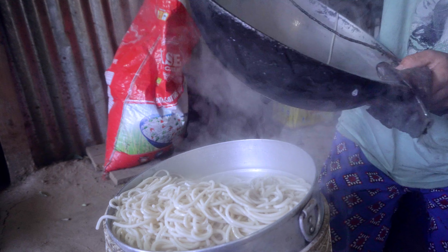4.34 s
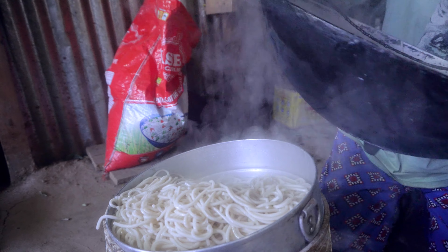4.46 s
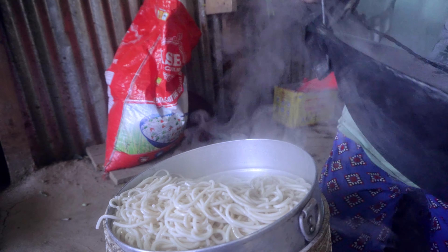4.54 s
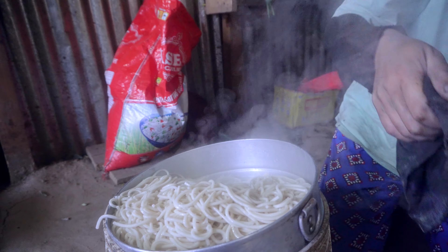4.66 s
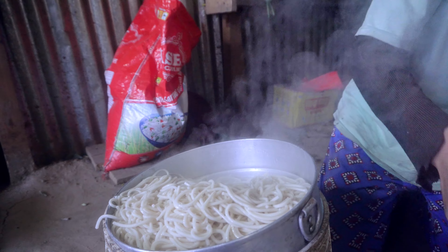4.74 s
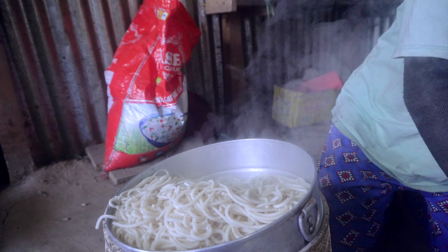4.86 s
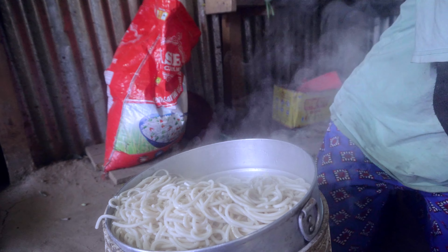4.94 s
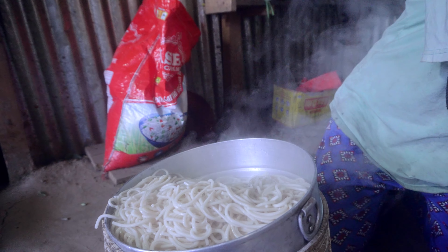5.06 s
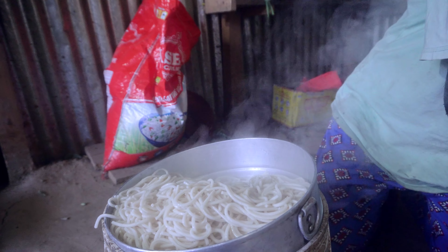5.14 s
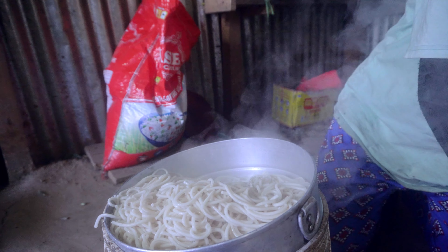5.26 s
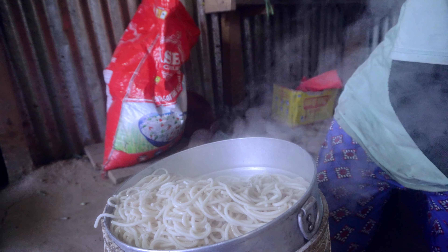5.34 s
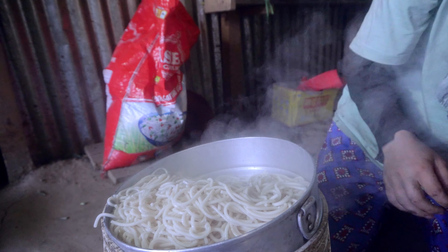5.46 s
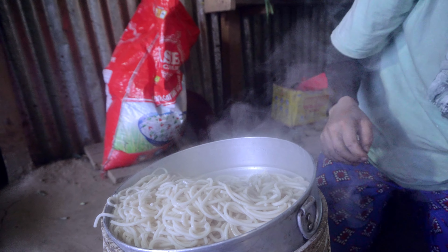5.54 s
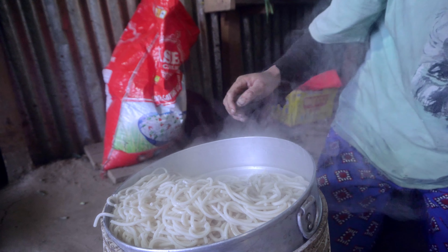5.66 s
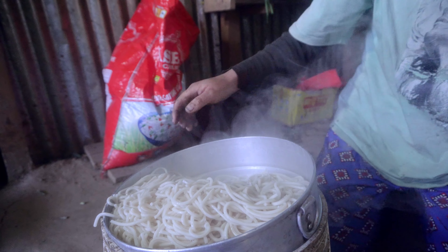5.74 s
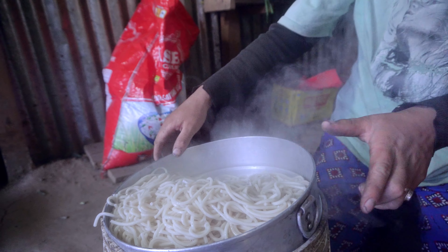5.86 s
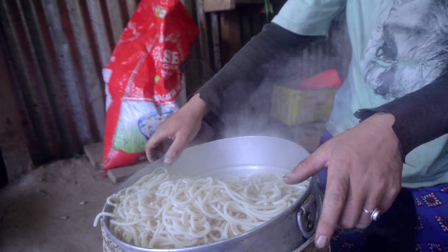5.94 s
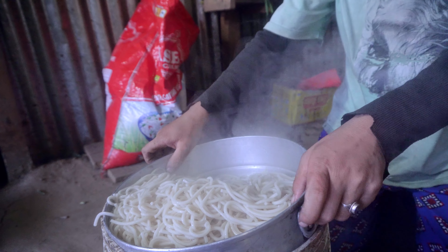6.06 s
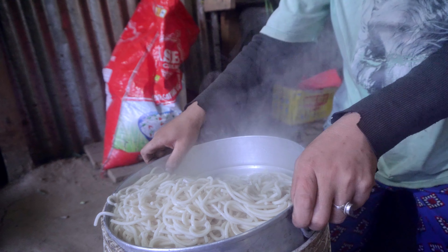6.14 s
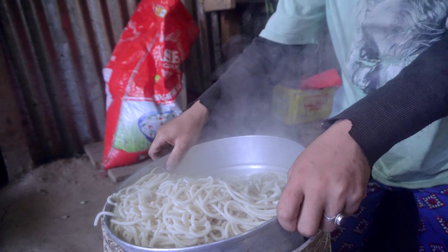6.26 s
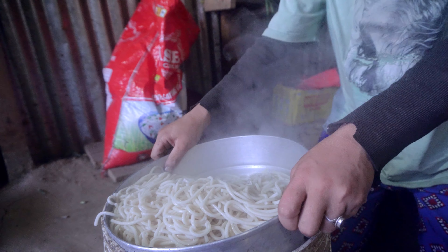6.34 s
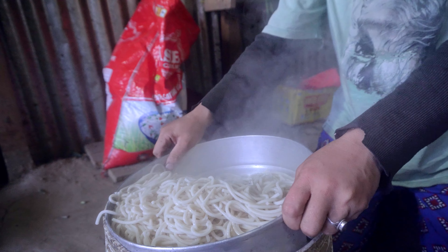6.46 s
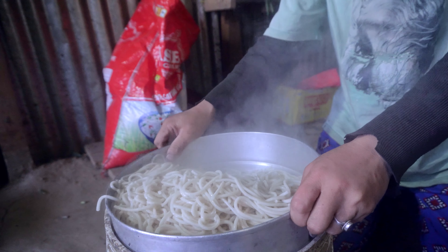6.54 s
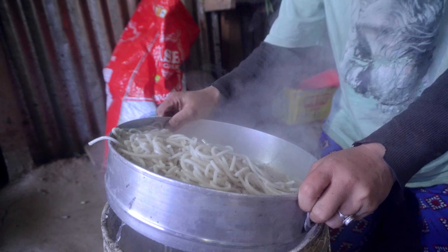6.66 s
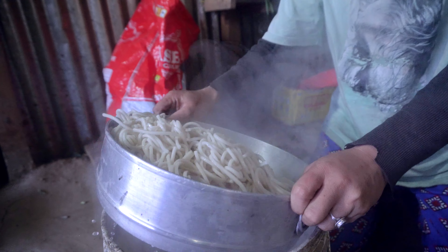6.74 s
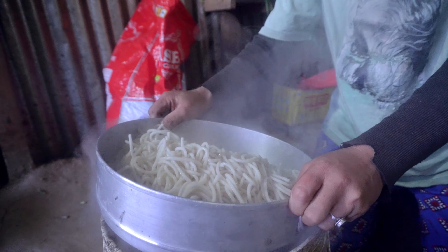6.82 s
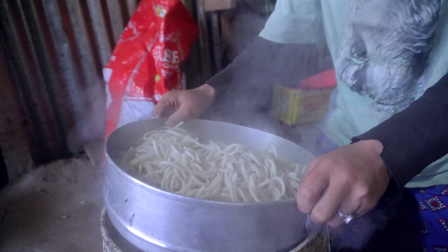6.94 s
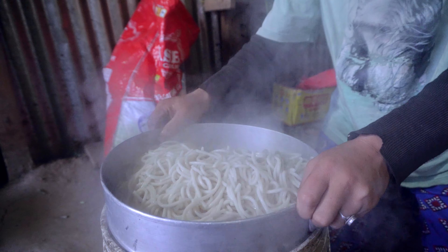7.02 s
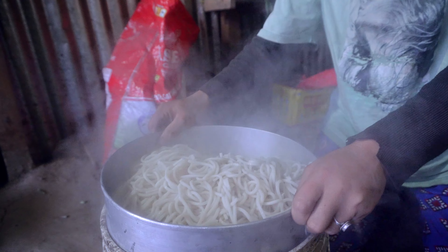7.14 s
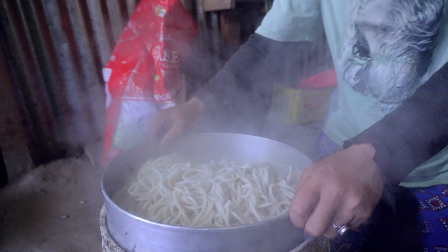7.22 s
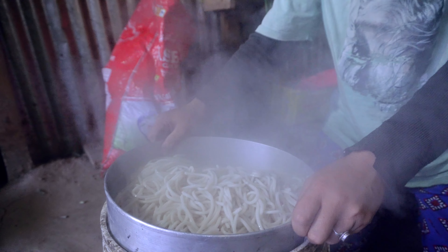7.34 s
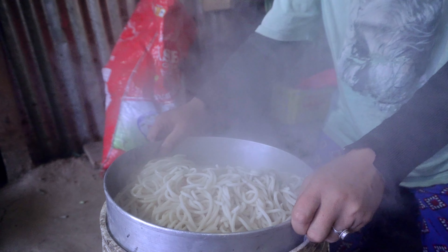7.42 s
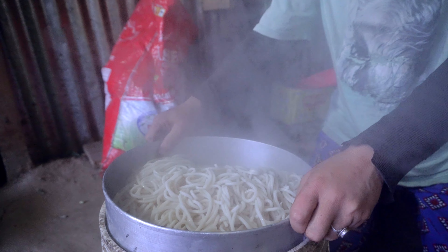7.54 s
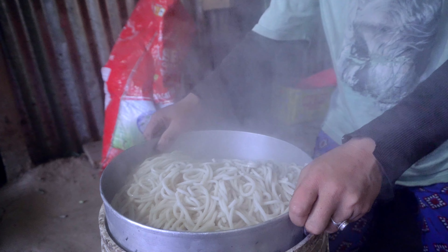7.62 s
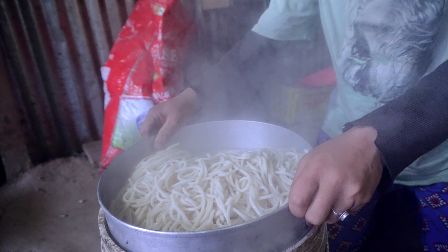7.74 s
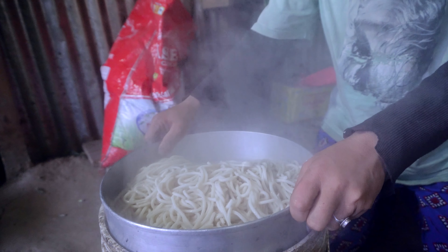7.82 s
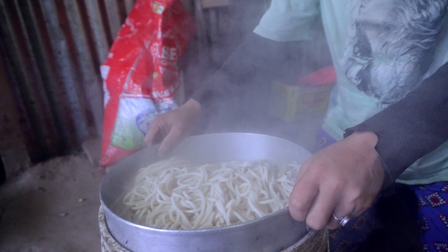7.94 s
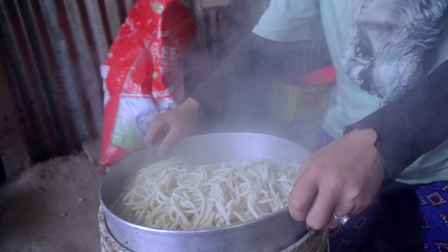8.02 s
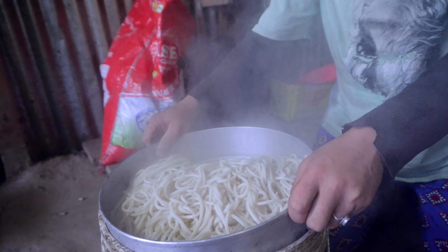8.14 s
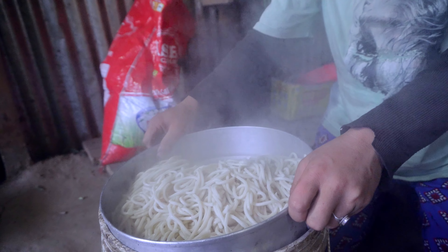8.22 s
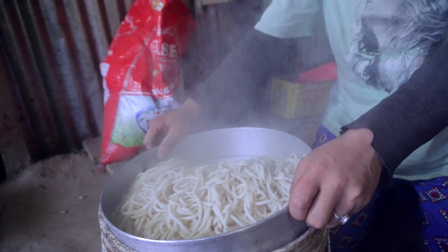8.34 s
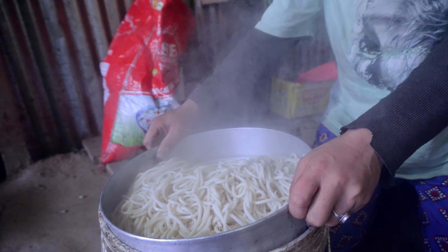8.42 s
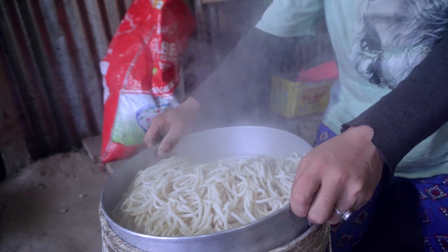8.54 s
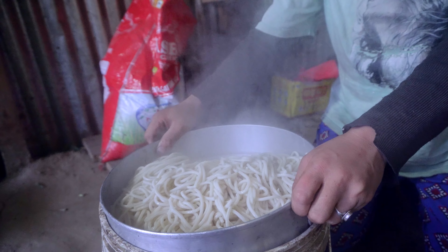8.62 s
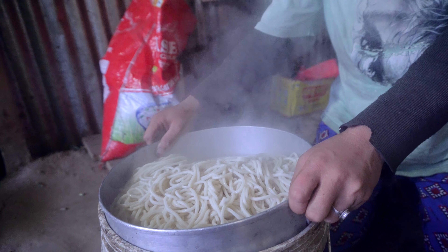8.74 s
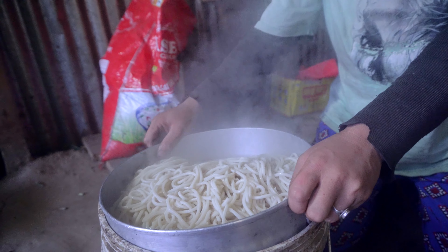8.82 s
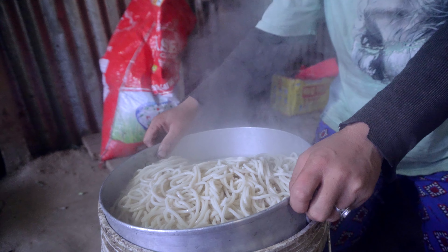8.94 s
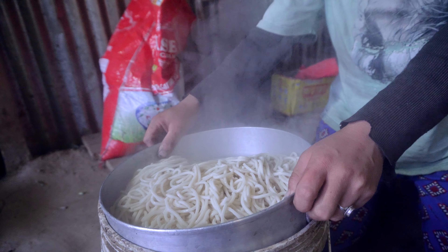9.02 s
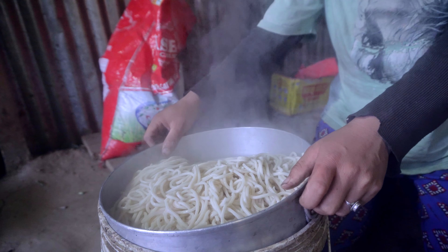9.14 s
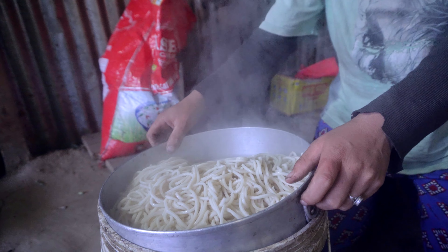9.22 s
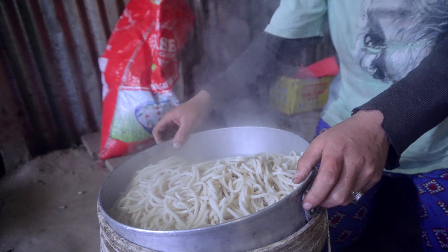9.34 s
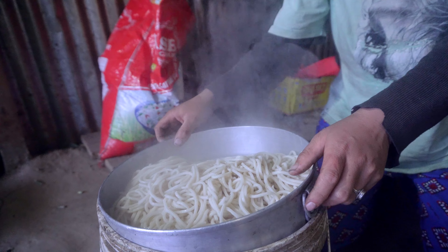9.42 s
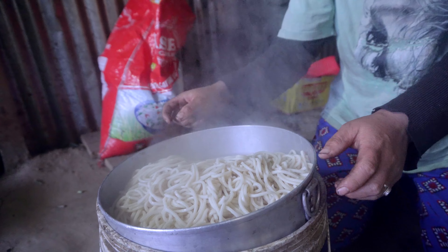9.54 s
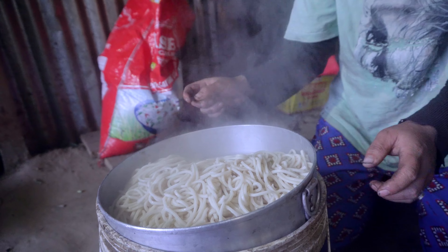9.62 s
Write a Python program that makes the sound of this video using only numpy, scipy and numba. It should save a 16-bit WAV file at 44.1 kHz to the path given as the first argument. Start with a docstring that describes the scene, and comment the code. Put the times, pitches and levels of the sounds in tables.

```python
"""Pouring out boiled noodles

Boiled noodles and their water are poured from a wok into a perforated metal tray in a small kitchen.
The stream gurgles and spatters, then thins to a trickle that drips into the vessel below.
The tray is lifted, shaken so that the wet noodles slither, and set down with a clank.
Water is made of many small ringing bubbles and puffs of noise; metal is gritty noise that rings the tray.
"""
import sys
import numpy as np
from scipy import signal
from scipy.fft import rfft, irfft, next_fast_len
from scipy.io import wavfile
from scipy.ndimage import uniform_filter1d
from numba import njit

SR = 44100
rng = np.random.default_rng(int(sys.argv[2]) if len(sys.argv) > 2 else 0)


def int16_out(signal):
    """Quantize to a 16-bit WAV file."""
    q = np.round(np.clip(np.atleast_2d(signal).T, -1, 1) * 32767)
    wavfile.write(sys.argv[1], SR, q.astype(np.int16))


N = 426888
TIME = np.arange(N) / SR

# Colours of the water sounds, the big bubbles first.
# Each row: frequency in Hz, strength in dB per Hz (only the shape matters).
GURGLE_COLOUR = [(60, -70), (140, -10), (200, -34.5), (290, -16), (390, -16.5), (560, 0.5), (680, 1.5),
                 (900, -8.5), (1600, -40)]
BUBBLING_COLOUR = [(150, -74), (640, -3), (840, 4), (1000, -0.5), (1500, 0.5), (1900, -11.5), (2600, -9.5),
                   (5000, -40)]
SPATTER_COLOUR = [(150, -36.5), (1300, -2), (2100, 2), (3400, 1), (4700, -1), (7000, -7), (11000, -13.5),
                  (15500, -11.5)]
TRICKLE_COLOUR = [(50, -51), (150, -1), (460, -6), (650, -8), (1150, -5.5), (1500, -3), (1900, -7.5),
                  (2800, -3.5), (7000, -27.5)]
SLITHER_COLOUR = [(200, -59), (900, 8.5), (1800, 0.5), (3000, 1.5), (4500, 1.5), (7000, -4.5),
                  (11000, -10.5), (15500, -7)]
# Colours of the slaps and ticks, the metal on its stand, the dull bumps, the low scuffs and the steady hiss.
# Each row: frequency in Hz, strength in dB per Hz (only the shape matters).
SLAP_COLOUR = [(500, -12), (2500, -4.5), (5500, 5.5), (9000, -8.5), (15500, -14)]
CONTACT_COLOUR = [(80, -46), (420, -10.5), (850, 1), (1400, 6.5), (2400, 1), (4300, 4), (8500, -10.5),
                  (15000, -16)]
BUMP_COLOUR = [(60, -25), (160, 8), (380, 2.5), (900, -15.5)]
SCUFF_COLOUR = [(50, -6), (110, -3), (180, 8), (380, 11), (700, -6), (2000, -43)]
HISS_COLOUR = [(40, -27), (1200, 9), (3500, 5), (12000, -11.5)]
HISS_DB = -55.5

# Strength of the stream leaving the wok. Each row: time in seconds, flow in dB.
FLOW = [(0, -36.5), (0.62, -38), (1.85, -36.5), (2.1, -39), (3.15, -38), (3.31, -42.5), (3.5, -37),
        (4.35, -39), (4.9, -41), (5.25, -39.5), (5.45, -51.5)]
STOP_DB_PER_S = 40  # the stream breaks off once the wok is empty
BARE_DB, COVER_S = 6.5, 0.36  # extra spatter on bare metal, until noodles cover it
SPATTER_DB_PER_S, PLUNGE_DB_PER_S = 1.17, 2.5  # the growing heap cushions the spatter and the plunge
# Gushes that come with clumps of noodles.
# Each row: start in seconds, length in seconds, spatter in dB, bubbling in dB.
GUSHES = [(0.69, 0.12, -44, -39), (2.18, 0.48, -42.5, -42.5), (2.8, 0.18, -42.5, -40),
          (3.86, 0.43, -45, -40), (4.2, 0.33, -52, -40.5), (4.64, 0.13, -52, -39.5),
          (4.98, 0.088, -39.5, -46)]
# The water held in the heap runs out, then settles to a steady drip.
EMPTY_S, TAKEOVER_S = 5.56, 0.67
RUNOFF_DB, RUNOFF_DB_PER_S, DRIP_DB = -45.5, 13.5, -57
GURGLE_DB, GURGLE_DB_PER_S = -52, 9.5
SETTLE_DB, SETTLE_DB_PER_S = -54.5, 3.5
# Shifts of the heap of noodles.
# Each row: start in seconds, length in seconds, slither in dB, water shaken out in dB.
SLIDES = [(5.5, 0.066, -50.5, -47), (5.695, 0.078, -50.5, -44.5), (6.28, 0.074, -52, -62),
          (6.552, 0.32, -51.5, -54), (6.88, 0.14, -45, -58), (7.04, 0.42, -50.5, -55),
          (7.5, 0.17, -50, -49.5), (7.638, 0.12, -45.5, -47.5), (7.764, 0.29, -45, -51),
          (8.08, 0.4, -54, -51), (8.65, 0.28, -58, -54.5)]
SWELL_PEAK, SWELL_CURVE = 0.28, 0.46  # share of a gush or slide spent speeding up; steepness of its flanks

# Single drops that trap a ringing bubble. Each row: time in seconds, peak in dB, pitch in Hz.
DROPS = [(0.031, -20, 2160), (0.073, -12, 3250), (.41, -10.5, 2900), (0.728, -15.5, 3200),
         (1.353, -9.5, 3330), (1.507, -21, 4280), (2.019, -20.5, 940), (2.223, -21.5, 940),
         (3.234, -22.5, 2820), (3.557, -22.5, 723), (3.876, -25, 1550), (4.806, -23, 1200),
         (5.118, -25.5, 1650), (5.144, -26, 1640), (5.178, -22, 1210), (5.283, -24, 840), (5.522, -33, 900),
         (5.721, -30, 1180), (5.846, -34, 1110), (5.989, -34, 1100), (6.168, -32.5, 1080),
         (6.207, -28, 3160), (6.331, -22, 1210), (6.412, -32, 3120), (6.454, -35.5, 1120),
         (6.5, -33.5, 1210), (7.802, -30.5, 1480), (7.882, -22.5, 1460), (7.999, -28, 1084),
         (8.382, -35, 2880), (8.425, -30.5, 1140), (8.505, -32, 1460), (8.683, -27, 3300),
         (8.892, -30, 1470), (8.994, -34.5, 1140), (9.471, -35, 1110), (9.573, -36, 2740),
         (9.616, -32, 2860)]
# Short sharp slaps and ticks of water, noodles or tray. Each row: time in seconds, level in dB.
SLAPS = [(0.214, -21.5), (0.466, -22.5), (0.774, -26.5), (1.952, -29), (2.911, -26.5), (6.831, -37),
         (7.069, -38), (7.263, -37), (8.26, -40), (8.285, -39), (9.469, -47)]
SLAP_RISE_S, SLAP_FALL_S = 0.0001, 0.0053

# Metal knocks of wok, tray and handles.
# Each row: time in seconds, level in dB, brightness in dB per octave, contact length in seconds.
KNOCKS = [(4.435, -27.5, 4.5, 0.0046), (4.459, -32, 5.5, 0.022), (4.85, -27.5, -2, 0.0027),
          (6.645, -21, 3.5, 0.0015), (6.686, -23.5, 1.5, 0.002), (6.689, -32, 10, 0.0083),
          (6.86, -29.5, 2, 0.0027), (7.118, -29, -0.5, 0.0018), (7.139, -34, 0, 0.0036),
          (7.203, -28, -4.5, 0.0034), (7.35, -29.5, 0, 0.013), (7.371, -29, 2.5, 0.0041),
          (7.751, -32.5, 2, 0.002), (7.884, -12, 4, 0.0028), (7.912, -22, -1.5, 0.0031),
          (9.248, -41.5, 3.5, 0.0091)]
# Strokes of the tray scraping over its stand. Each row: start in seconds, length in seconds, grit in dB,
# squeak in dB, squeak at the start in Hz, squeak at the end in Hz.
SCRAPES = [(6.872, 0.077, -39, -46, 840, 860), (6.961, 0.055, -61, -46, 1500, 2320),
           (7.325, 0.094, -45.5, -44, 860, 780), (9.003, 0.038, -52, -44.5, 2270, 2100),
           (9.009, 0.105, -71, -50.5, 850, 530), (9.355, 0.035, -68, -46, 3500, 3800)]
SCRAPE_RISE_S, SCRAPE_RELEASE_S, SCRAPE_FADE_DB = 0.0056, 0.016, -9
# Ringing modes of the tray. Each row: frequency in Hz, strength in dB.
TRAY_MODES = [(863, 4), (1459, 0.5), (2137, 2), (2676, -5), (2800, -4), (3386, -2), (3595, 2), (4054, -3),
              (4366, -4), (4834, -28), (6000, -3)]
TRAY_T60, TRAY_DAMPING = 0.068, 0.15  # seconds to fall 60 dB at 1 kHz; how much faster higher modes die
# Dull bumps of the tray on its stand and of the wok put aside.
# Each row: time in seconds, level in dB, pitch in Hz.
BUMPS = [(5.001, -41, 440), (6.708, -35.5, 247), (7.2, -47, 176), (7.26, -40.5, 182), (7.356, -53, 149),
         (7.913, -39.5, 156)]
# Low scuffs as the wok is put aside. Each row: time in seconds, level in dB.
SCUFFS = [(5.001, -51.5), (5.14, -58), (5.3, -60.5), (5.46, -64)]
SCUFF_RISE_S, SCUFF_T60 = 0.004, 0.89

# How long the room rings. Each row: frequency in Hz, seconds to fall 60 dB.
ROOM_T60 = [(150, 0.59), (3000, 0.32), (15000, 0.11)]
# Loudness of the left side against the right. Each row: frequency in Hz, left minus right in dB.
BALANCE = [(100, 0.5), (350, 8), (700, 6), (1290, 5), (4400, -2), (8100, -3.5), (15000, -2)]
# Phase of the left side against the right. Each row: frequency in Hz, lead of the left in radians.
LEAD = [(80, 0.081), (430, 0.81), (7500, 1), (12000, 0.16)]
EDGE_HZ = 16050  # the sound stops around here


def amp(db):
    """Turns decibels into gain."""
    return 10 ** (np.asarray(db) / 20)


def evened(x):
    """Scales a sound to an average (rms) level of 1."""
    return x / np.sqrt(np.mean(x ** 2) + 1e-20)


def read(points, hz):
    """Reads a table between its rows, along log frequency."""
    f, value = np.transpose(points)
    return np.interp(np.log(hz + 1), np.log(f + 1), value)


def coloured(x, spectrum):
    """Filters x by a colour table and sets it to rms 1."""
    size = next_fast_len(len(x) + 2048, True)
    gain = amp(read(spectrum, np.fft.rfftfreq(size, 1 / SR)))
    return evened(irfft(rfft(x, size) * gain, size)[:len(x)])


def no_bass(x, hz, order):
    """High-pass: small or thin things give off little bass."""
    return signal.sosfilt(signal.butter(order, hz, "high", fs=SR, output="sos"), x)


def add(mix, s, sound):
    """Mixes a sound in at time s."""
    part = mix[max(round(s * SR), 0):][:len(sound)]
    part += sound[:len(part)]


def surges(per_s, depth_db):
    """Water arrives in uneven clumps: a gain that wanders between random levels."""
    return amp(depth_db * np.interp(TIME * per_s, np.arange(4096), rng.standard_normal(4096)))


def swells(rows):
    """Two gains, one per dB column: each moving mass speeds up, then slows to rest."""
    power = np.zeros((2, N))
    for s, length, first_db, second_db in rows:
        speed = np.interp((TIME - s) / length, [0, SWELL_PEAK, 1], [0, 1, 0])
        shape = np.sin(np.pi / 2 * speed) ** SWELL_CURVE
        power += (amp([[first_db], [second_db]]) * shape) ** 2
    return np.sqrt(power)


def hiss():
    """A steady, smooth background hiss: noise partly shared by both ears."""
    shared = rng.standard_normal(N)
    ears = [coloured(shared + .5 * own, HISS_COLOUR) for own in rng.standard_normal((2, N))]
    return amp(HISS_DB) * np.array(ears)


def echoes(near_db=-6, near_t60=0.063, far_db=-11):
    """Quick echoes inside the vessel and a short tail from the tin walls, different at each ear."""
    hz, t, z = signal.stft(rng.standard_normal((2, SR // 3)), SR, nperseg=256)
    fading = z * amp(-60 * t / read(ROOM_T60, hz)[:, None])
    far = signal.istft(fading, SR, nperseg=256)[1]
    t = np.arange(far.shape[1]) / SR
    far = far * np.clip(t / 0.019, 0, 1)  # the tail builds up over 19 ms
    near = rng.standard_normal(far.shape) * amp(-60 * t / near_t60)
    near = amp(near_db) * near / np.linalg.norm(near[0])
    far = amp(far_db) * far / np.linalg.norm(far[0])
    return no_bass(near + far, 750, order=1)  # long waves are hardly scattered


def kitchen(x, count=8, hops_per_s=35):
    """The sounds come now from here, now from there, and each spot has its own echoes."""
    spot = np.cumsum(surges(per_s=10, depth_db=4)) * hops_per_s / SR
    out = np.array([x, x])  # the direct sound
    for k in range(count):
        # each spot fades in and out as the wandering position passes it
        share = np.cos(np.pi / 2 * np.minimum(abs((spot - k) % count - 1), 1))
        out = out + signal.oaconvolve((x * share)[None], echoes(), axes=1)[:, :N]
    return out


def shuffle():
    """Low, uneven scuffs of noise that start quickly and fade."""
    push, t = np.zeros(N), np.arange(SR) / SR
    for s, db in SCUFFS:
        add(push, s, np.minimum(t / SCUFF_RISE_S, 1) * amp(db - 60 * t / SCUFF_T60))
    return coloured(rng.standard_normal(N), SCUFF_COLOUR) * push * surges(per_s=19, depth_db=2.0)


def bumps(attack_s=0.0031, t60=0.15, thud_db=-4):
    """A heavy thing lands softly: one damped low tone and a puff of dull noise."""
    out, t = np.zeros(N), np.arange(SR // 3) / SR
    for s, db, hz in BUMPS:
        thud = amp(thud_db) * coloured(rng.standard_normal(len(t)), BUMP_COLOUR)
        shape = (1 - np.exp(-t / attack_s)) ** 2 * amp(db - 60 * t / t60)
        add(out, s, shape * (np.sin(2 * np.pi * hz * t) + thud))
    return no_bass(out, 100, order=2)


def splats(per_s, spread_db, burst_s):
    """Droplets bursting on wet surfaces, or tiny jerks: very short puffs of noise at random times."""
    hit, big, noise = rng.random(N), rng.random(N), rng.standard_normal(N)
    power = (hit < per_s / SR) * amp(-spread_db * np.log(big + 0.012)) ** 2
    fading = signal.lfilter([1], [1, -np.exp(-1 / (burst_s * SR))], power)
    return evened(noise * np.sqrt(fading + 1e-12))


def ring(modes, pair_hz=130):
    """The tray's ring after a tap, energy 1: it is not quite round, so each mode is a beating pair."""
    t = np.arange(SR // 3) / SR
    fall_db = 60 * t / TRAY_T60
    out = np.zeros(len(t))
    for hz, db in modes + modes:
        pitch = hz + pair_hz * (rng.random() - .5)  # drawn anew on each call: it moves with the load
        tone = np.sin(2 * np.pi * (pitch * t + rng.random()))
        out += amp(db - fall_db * (hz / 1000) ** TRAY_DAMPING) * tone
    return out / np.linalg.norm(out)


def resonate(x, hz, width_hz):
    """A resonance that follows the curve hz, at rms 1."""
    turn = np.exp(2j * np.pi * np.cumsum(hz) / SR)
    r = np.exp(-np.pi * width_hz / SR)
    return evened((turn * signal.lfilter([1 - r], [1, -r], x / turn)).real)


def scrapes(squeak_width_hz=260, ring_db=-9):
    """The rim catches and slips in jerks that ring the tray and a squeak gliding with the contact point."""
    out, slips = np.zeros(N), splats(per_s=400, spread_db=2, burst_s=0.0011)
    for s, length, grit_db, squeak_db, from_hz, to_hz in SCRAPES:
        t = np.arange(round(length * SR)) / SR
        grit = coloured(slips[round(s * SR):][:len(t)], CONTACT_COLOUR)
        pitch = from_hz + (to_hz - from_hz) * t / length
        squeak = resonate(resonate(grit, pitch, squeak_width_hz), pitch, squeak_width_hz)
        push = np.clip(np.minimum(t / SCRAPE_RISE_S, (length - t) / SCRAPE_RELEASE_S), 0, 1)
        push = push * amp(SCRAPE_FADE_DB * t / length)
        add(out, s, push * (amp(grit_db) * grit + amp(squeak_db) * squeak))
        add(out, s, amp(grit_db + ring_db) * signal.fftconvolve(push * grit, ring(TRAY_MODES)))
    return out


def knocks(pivot_hz=3000, rattle_db=-16, rattle_t60=0.19, chatter_db=4, ring_db=-12):
    """A gritty crack and a dense rattle, heard directly and through the modes of the noodle-damped tray."""
    out, t = np.zeros(N), np.arange(SR // 4) / SR
    for s, db, bright, length in KNOCKS:
        # brightness tilts the colour around the pivot, down to 1 kHz
        colour = [(hz, d + bright * np.log2(max(hz, 1000) / pivot_hz)) for hz, d in CONTACT_COLOUR]
        grit = coloured(rng.standard_normal(len(t)), colour)
        chatter = chatter_db * evened(uniform_filter1d(rng.standard_normal(len(t)), size=50))
        crack = np.exp(-t / length)
        rattle = amp(rattle_db + chatter - 60 * t / rattle_t60)
        onset = 1 - np.exp(-t / 0.00035)
        blow = amp(db) * grit * (crack + rattle) * onset
        add(out, s, blow)
        add(out, s, amp(ring_db) * signal.fftconvolve(blow, ring(TRAY_MODES)))
    return no_bass(out, 310, order=2)


def slaps():
    """Short sharp slaps and ticks of water, noodles or tray: one puff of noise each."""
    out, t = np.zeros(N), np.arange(SR // 30) / SR
    shape = (1 - np.exp(-t / SLAP_RISE_S)) * np.exp(-t / SLAP_FALL_S)
    for s, db in SLAPS:
        add(out, s, amp(db) * shape * coloured(rng.standard_normal(len(t)), SLAP_COLOUR))
    return no_bass(out, 900, order=2)


def drops(churned_cycles=2.8, calm_cycles=7.7, growth=0.65, rise=0.0084, splash_db=-6, splash_s=0.00079):
    """A small splash and one bubble each, cut short while the pool churns; later, strong drops ring longest."""
    out, t = np.zeros(N), np.arange(SR // 10) / SR
    for s, db, hz in DROPS:
        turns = hz * t
        calm = calm_cycles * amp(growth * (db + 19.5))
        # the water calms between 4.8 and 6 s; high drops ring for fewer cycles
        cycles = np.interp(s, [4.8, 6], [churned_cycles, calm]) * (hz / 1000) ** -.35
        shape = np.exp(-turns / cycles) * (1 - np.exp(-turns)) ** 2
        tone = np.sin(2 * np.pi * turns * (1 + rise * turns / cycles))  # the pitch glides up
        add(out, s, amp(db) * shape / shape.max() * tone)
        splash = np.exp(-t / splash_s) * coloured(rng.standard_normal(len(t)), TRICKLE_COLOUR)
        add(out, s, amp(db + splash_db) * splash)
    return no_bass(out, 700, order=2)


@njit
def sum_bubbles(length, starts, pitch, sizes, cycles, rise):
    """Each bubble swells within a cycle, rings down and glides up; pitch is in cycles a sample."""
    out = np.zeros(length)
    for k in range(len(starts)):
        step = np.exp(pitch[k] * (2j * np.pi - 1 / cycles[k]))
        glide = np.exp(4j * np.pi * rise * pitch[k] ** 2 / cycles[k])
        wave, closed, opening = sizes[k] + 0j, 1., np.exp(-pitch[k])
        for i in range(starts[k], min(starts[k] + int(6 * cycles[k] / pitch[k]), length)):
            out[i] += (1 - closed) * wave.imag
            wave, step, closed = wave * step, step * glide, closed * opening
    return out


def bubbles(count, low_hz, high_hz, cycles, spread_db, rise=0.014):
    """A cloud of bubbles of random pitch and size, evenly spread in log pitch, the high ones made larger."""
    when, which, big, damping, sign = rng.random((count, 5)).T
    hz = low_hz * (high_hz / low_hz) ** which
    sizes = hz * amp(-spread_db * np.log(big + .02)) * np.sign(sign - .5)
    starts = (when * N).astype(np.int64)
    return evened(sum_bubbles(N, starts, hz / SR, sizes, cycles * (.5 + damping), float(rise)))


def runoff(db, db_per_s):
    """Gain of a sound that takes over as the pour ends and dies away as the heap empties."""
    since = TIME - EMPTY_S
    return np.clip(1 + since / TAKEOVER_S, 0, 1) * amp(db - db_per_s * np.maximum(since, 0))


def drain(slither_db=1.2, plop_db=-2.5, tick_db=-3):
    """Threads and plops fall through the holes; noodles fizz softly at rest and tick unstuck as they slide."""
    threads = bubbles(count=9000, low_hz=615, high_hz=4240, cycles=4.6, spread_db=2.5)
    plops = amp(plop_db) * bubbles(count=300, low_hz=843, high_hz=1740, cycles=2.25, spread_db=0.5)
    fizz = bubbles(count=9000, low_hz=1520, high_hz=9200, cycles=1.9, spread_db=3)
    fizz = evened(fizz + amp(3.5) * rng.standard_normal(N))
    ticks = amp(tick_db) * splats(per_s=140, spread_db=3.5, burst_s=0.00041)
    smacks = fizz * surges(per_s=82, depth_db=6) + ticks
    sliding, shed = swells(SLIDES)
    emptying, dripping = runoff(RUNOFF_DB, RUNOFF_DB_PER_S), runoff(DRIP_DB, 0)
    water = np.linalg.norm([emptying, dripping, shed], axis=0)
    resting = coloured(fizz, SLITHER_COLOUR) * runoff(SETTLE_DB, SETTLE_DB_PER_S)
    slither = coloured(smacks, SLITHER_COLOUR) * amp(slither_db) * sliding
    return coloured(threads + plops, TRICKLE_COLOUR) * water + resting + slither


def flow():
    """Gain of the stream over time."""
    s, db = np.transpose(FLOW)
    return amp(np.interp(TIME, s, db) - STOP_DB_PER_S * np.maximum(TIME - s[-1], 0))


def pour(plunge_db=-1.0, bubbling_db=-2.05, spatter_db=3, glug_db=-3):
    """The stream drives bubbles into the pool over a rush of foam; lumps of water glug in and throw spatter."""
    deep = bubbles(count=4000, low_hz=213.6, high_hz=1006, cycles=3.5, spread_db=1.0)
    middle = bubbles(count=7000, low_hz=587.0, high_hz=3000, cycles=2.2, spread_db=2.8)
    foam = amp(2.5) * rng.standard_normal(N)
    glugs = amp(glug_db) * bubbles(count=550, low_hz=617, high_hz=1914, cycles=2.1, spread_db=1.5)
    churn = (middle + foam + glugs) * surges(per_s=49, depth_db=0.97)
    fine = bubbles(count=15000, low_hz=1434, high_hz=12000, cycles=3.1, spread_db=5.5)
    mist = amp(3.5) * rng.standard_normal(N)
    ticks = splats(per_s=320, spread_db=4.0, burst_s=0.00013)
    spray = (fine + mist + ticks) * surges(per_s=40, depth_db=1.36)

    # gains over time
    stream = flow()
    gush_spray, gush_bubbles = swells(GUSHES)
    bubbling = np.hypot(stream * amp(bubbling_db), gush_bubbles)
    cushioned = bubbling * amp(plunge_db - PLUNGE_DB_PER_S * TIME)
    plunge = np.hypot(cushioned, runoff(GURGLE_DB, GURGLE_DB_PER_S))
    bare_db = BARE_DB * np.exp(-TIME / COVER_S)
    spatter = np.hypot(stream * amp(spatter_db + bare_db - SPATTER_DB_PER_S * TIME), gush_spray)

    gurgle = coloured(deep, GURGLE_COLOUR) * surges(per_s=16, depth_db=2.3) * plunge
    return gurgle + coloured(churn, BUBBLING_COLOUR) * bubbling + coloured(spray, SPATTER_COLOUR) * spatter


def scene():
    """All sources in the kitchen, picked up by two close microphone ports."""
    metal = shuffle() + bumps() + scrapes() + knocks()
    water = drops() + drain() + pour()
    wet = kitchen(metal + slaps() + water) + hiss()
    size = next_fast_len(N + 2048, True)
    hz = np.fft.rfftfreq(size, 1 / SR)
    side = np.array([[.5], [-.5]])  # left and right each take half of the difference
    ports = amp(side * read(BALANCE, hz)) * np.exp(1j * side * read(LEAD, hz))
    return amp(-1.3) * irfft(rfft(wet, size) * ports, size)[:, :N]


def record(dry):
    """Low-pass: removes the very highest treble."""
    low_pass = signal.firwin(511, EDGE_HZ, window=("kaiser", 9), fs=SR)
    return signal.oaconvolve(dry, low_pass[None], "same")


dry = scene()
out = record(dry)
int16_out(out)
```